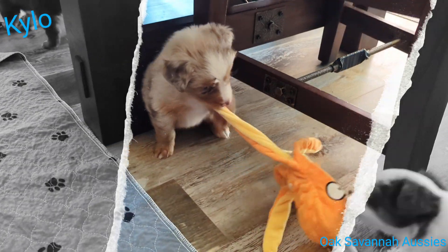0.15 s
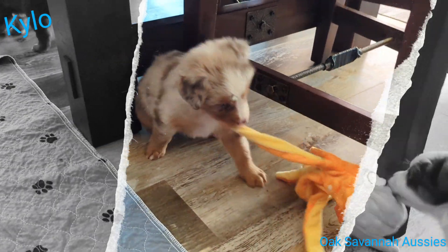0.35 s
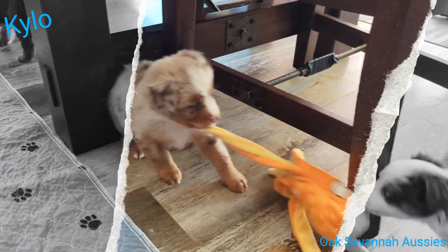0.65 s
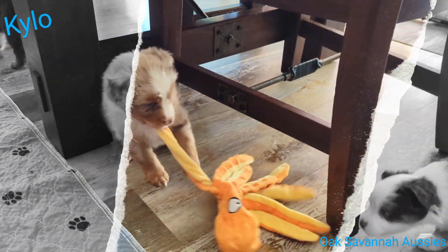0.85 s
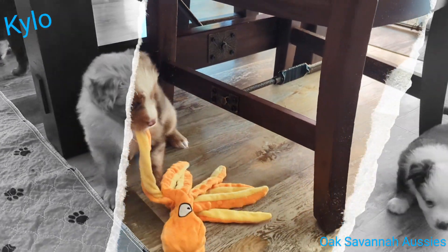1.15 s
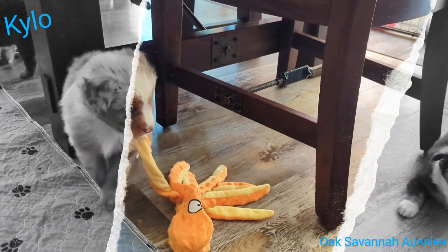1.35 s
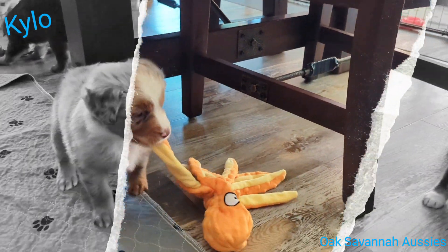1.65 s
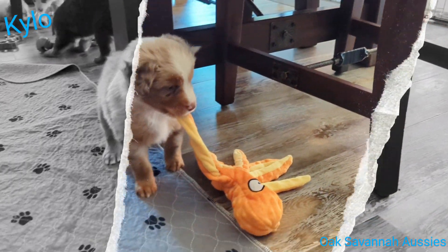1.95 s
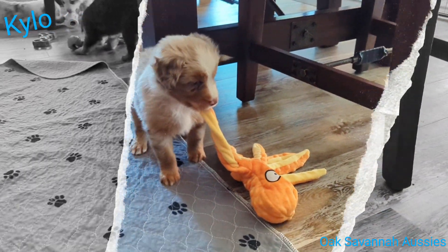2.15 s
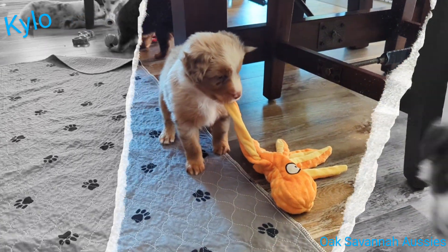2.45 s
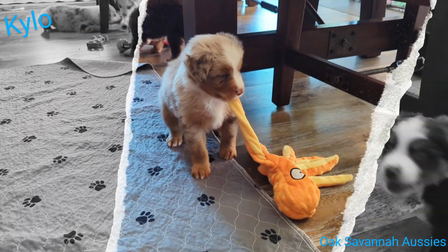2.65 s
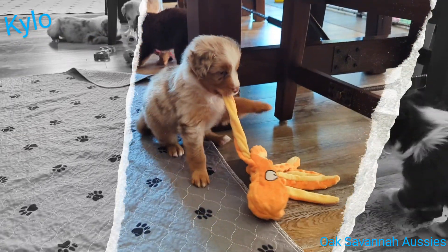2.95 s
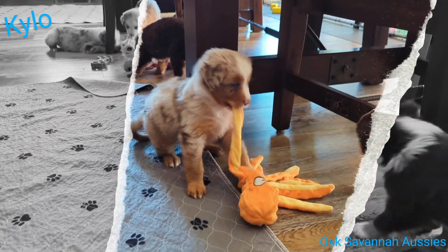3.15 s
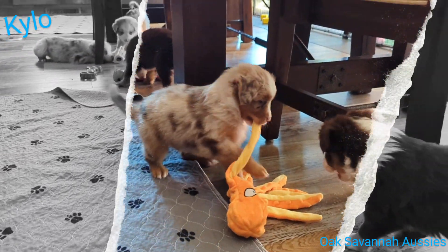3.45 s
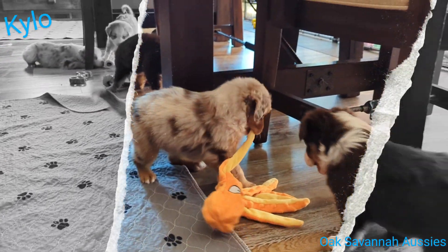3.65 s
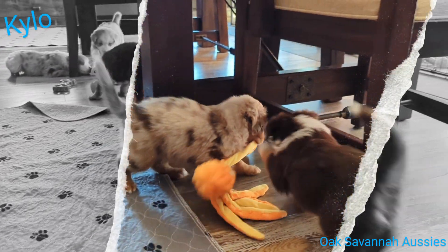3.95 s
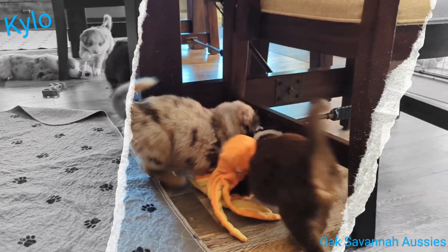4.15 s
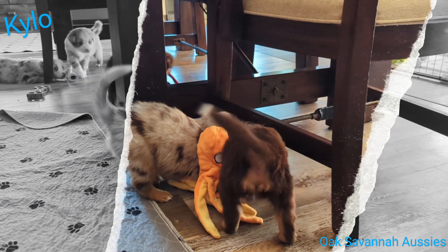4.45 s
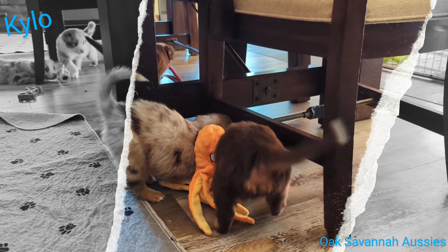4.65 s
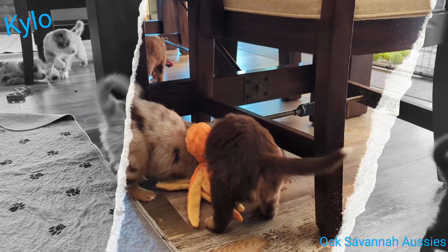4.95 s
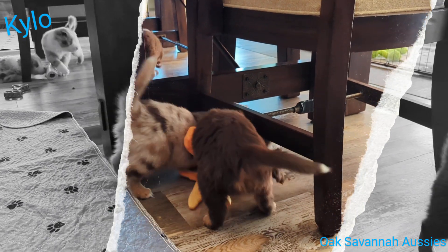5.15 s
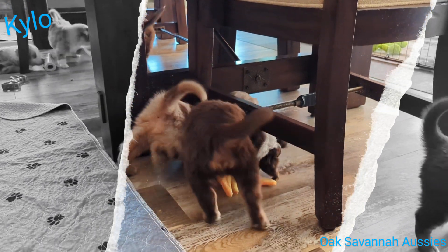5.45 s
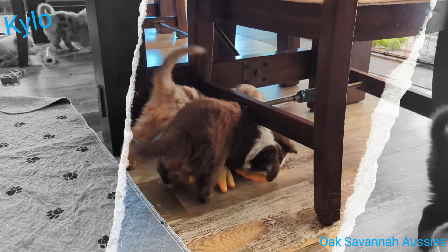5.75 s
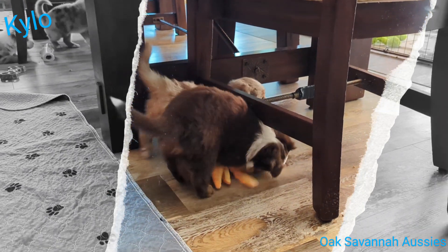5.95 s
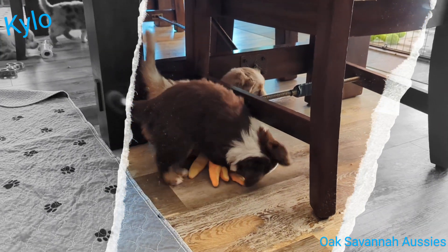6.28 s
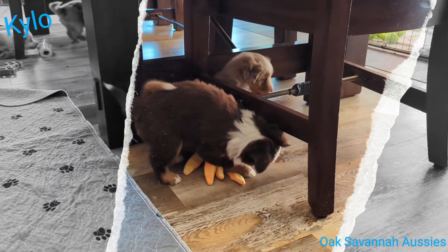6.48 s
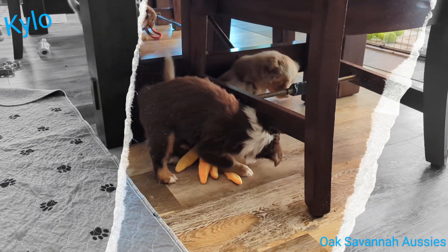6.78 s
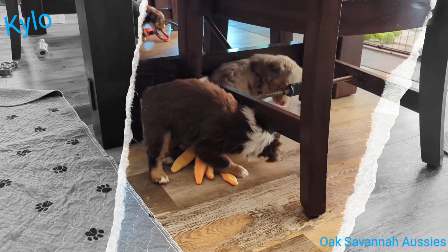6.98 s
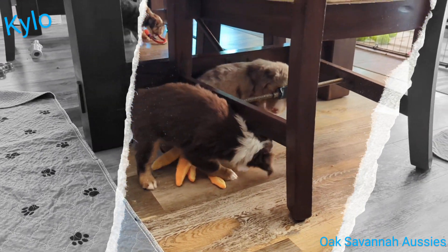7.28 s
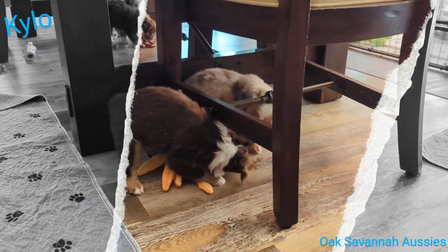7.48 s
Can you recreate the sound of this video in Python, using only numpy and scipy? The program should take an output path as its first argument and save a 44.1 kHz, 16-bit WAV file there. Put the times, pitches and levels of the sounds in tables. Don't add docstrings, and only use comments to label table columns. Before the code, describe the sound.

Close, low microphone in a quiet living room. Puppies brace and tug a plush toy, giving soft low thumps on floorboards, small claw ticks and thin foil crinkles. Soon a wooden chair is knocked hard, cracking and rattling with a short room echo. After a calmer moment, wrestling brings more thumps, crackles, fur rustle and light wood taps over faint house air.

```python
import sys
import numpy as np
from scipy import signal
from scipy.fft import rfft, irfft, next_fast_len
from scipy.io import wavfile
from scipy.ndimage import uniform_filter1d

SR = 44100
rng = np.random.default_rng(int(sys.argv[2]) if len(sys.argv) > 2 else 0)


def output_pcm(signal):
    pcm = np.clip(np.atleast_2d(signal).T, -1, 1) * 32767
    wavfile.write(sys.argv[1], SR, np.round(pcm).astype(np.int16))


def level_to_linear(level):
    exponent = np.asarray(level, float) / 20
    return 10 ** exponent


N = 336042


def unit(x):
    return x / np.sqrt(np.mean(x ** 2))


def colour(x, points):
    hz, db = np.transpose(points)
    size = next_fast_len(x.shape[-1])
    f = np.fft.rfftfreq(size, 1 / SR) + 1
    gain = level_to_linear(np.interp(np.log(f), np.log(hz), db))
    return irfft(rfft(x, size) * gain, size)[..., :x.shape[-1]]


def band(x, lo_hz, hi_hz):
    sos = signal.butter(2, [lo_hz, min(hi_hz, .45 * SR)], "band", fs=SR, output="sos")
    return signal.sosfilt(sos, x)


def walk(rate_hz):
    k = int(SR / rate_hz)
    held = np.repeat(rng.standard_normal(N // k + 1), k)
    return unit(uniform_filter1d(uniform_filter1d(held, k), k)[:N])


def pair(alike_hz):
    mid, side = rng.standard_normal((2, N))
    side = signal.sosfilt(signal.butter(1, alike_hz, "high", fs=SR, output="sos"), side)
    return np.array([mid + side, mid - side]) / np.sqrt(2)


def add(out, start_s, sound, peak_db, pan_db=0):
    i = int(start_s * SR)
    sound = sound[..., :N - i] * level_to_linear(peak_db) / np.abs(sound).max()
    out[:, i:i + sound.shape[-1]] += sound * level_to_linear([[pan_db / 2], [-pan_db / 2]])


def fade(t, t60_s, rise_s):
    return (1 - np.exp(-t / max(rise_s, 1e-5))) * np.exp(-np.log(1000) * t / max(t60_s, .004))


def strokes(rows, rest_db, bend=0.95):
    t = np.arange(0, N, SR // 2000) / SR
    power = 0
    for peak_s, swell_s, die_s, db in rows:
        away = np.maximum((peak_s - t) / max(swell_s, .004), (t - peak_s) / max(die_s, .004))
        power = power + level_to_linear(2 * (db - 20 * away ** bend))
    return 10 * np.log10(np.interp(np.arange(N) / SR, t, power) + level_to_linear(2 * rest_db))


# [start_s, peak_db, board_pitch_hz]
BRACING_PAWS = [(0.022, -36.5, 124), (0.357, -39.5, 112), (0.407, -36.5, 125), (0.508, -35, 159),
                (0.58, -32.5, 124), (0.647, -44, 145), (0.713, -30.5, 124), (0.837, -35.5, 171.6),
                (0.887, -35, 107), (1.005, -28.5, 124.3), (1.543, -18.5, 120.7), (1.601, -34, 130),
                (1.66, -28.5, 116.3), (1.9, -44, 112), (1.947, -33, 131.5), (2.022, -35.5, 140),
                (2.1, -42, 130), (2.211, -38.5, 126), (2.565, -43.5, 125), (2.677, -38.5, 129.7),
                (2.795, -39.5, 115.3)]
# [start_s, peak_db, board_pitch_hz]
WRESTLING_PAWS = [(3.074, -41, 99), (3.902, -36, 123), (4.106, -24, 106.6), (4.167, -29, 128),
                  (4.282, -37.5, 108), (4.362, -30, 109), (4.43, -29.5, 109.4), (4.69, -32.5, 117.4),
                  (4.765, -31, 106), (5.005, -37, 125), (5.191, -34.5, 114.4), (5.269, -24.5, 113.4),
                  (5.507, -41, 108), (5.589, -41, 73.5), (5.719, -30.5, 111.4), (6.447, -32.5, 106),
                  (6.815, -36.5, 126.5), (6.92, -23, 111), (7.099, -42.5, 126), (7.484, -37, 60)]


def paw_thumps():
    board_t60_s = 0.13
    bracing_knock_db, wrestling_knock_db = -14, -25.5
    out, t = np.zeros((2, N)), np.arange(SR // 5) / SR
    steps = [(*r, bracing_knock_db) for r in BRACING_PAWS]
    steps += [(*r, wrestling_knock_db) for r in WRESTLING_PAWS]
    for (s, db, hz, knock_db), noise in zip(steps, rng.standard_normal((len(steps), len(t)))):
        turn = 2 * np.pi * hz * (t + 0.0024 * (1 - np.exp(-t / 0.006)))
        low = np.sin(turn) + .3 * np.sin(1.352 * turn) + 0.37 * np.sin(0.551 * turn)
        add(out, s - .003, low * fade(t, board_t60_s, 0.02), db)
        add(out, s, band(noise * fade(t, 0.089, 0.0012), 180, 408), db + knock_db + 7)
    return out


# [start_s, peak_db, centre_hz, ring_t60_s]
CLAW_TICKS = [(0.4005, -45.5, 2520, 0.03), (0.512, -39.5, 2260, .037), (1.1845, -41, 4840, .019),
              (1.2675, -57.5, 2050, 0.016), (1.6655, -44, 4420, 0.02), (1.9015, -42, 2490, 0.021),
              (2.0242, -37, 2560, 0.057), (2.214, -47, 3060, .026), (3.27, -36, 3650, 0.028),
              (3.2924, -41, 4470, .02), (3.704, -39, 2100, .02), (7.544, -47, 4500, .03),
              (4.0959, -36, 2210, 0.046), (4.2187, -28.5, 2300, .02), (4.7827, -45, 2180, .02),
              (5.0306, -33.5, 2300, 0.03), (5.1791, -41.5, 2510, .017), (5.3925, -46, 3440, 0.021),
              (5.9498, -43, 2180, 0.07), (6.2895, -45, 2650, 0.054), (6.3656, -43, 2580, 0.037),
              (6.3894, -43, 3650, .022), (6.5856, -43.5, 2400, .022)]
# [start_s, peak_db, centre_hz,
# ring_t60_s]
FOIL_SNAPS = [(0.037, -40, 7240, 0.049), (0.1072, -36.5, 7100, 0.026), (0.178, -34.5, 7100, 0.049),
              (0.2486, -30.5, 12100, 0.075), (0.4996, -42, 11900, .016), (0.827, -33.5, 8200, 0.012),
              (1.0698, -35.5, 10700, 0.025), (1.2312, -36, 7560, 0.0096), (1.3739, -10, 6500, 0.03),
              (2.7196, -42, 7440, 0.048), (2.7848, -33.5, 9100, 0.2), (3.2375, -33, 9100, 0.025),
              (3.3305, -27.5, 6200, 0.02), (3.33, -30, 12000, 0.02), (3.393, -41.5, 7700, 0.043),
              (3.5317, -37, 7400, 0.052), (3.982, -37.5, 6600, 0.045), (4.2116, -25, 7300, 0.044),
              (4.2405, -36, 6500, 0.018), (5.0559, -31, 11900, 0.03), (5.0558, -32, 5300, 0.03),
              (5.0806, -32, 9100, 0.02), (5.207, -37.5, 6800, 0.046), (5.5077, -34.5, 10600, 0.049),
              (5.5728, -35, 8500, 0.057), (5.583, -37.5, 8000, .03), (6.4615, -35, 6100, 0.031),
              (6.4843, -38, 8060, 0.15), (6.761, -29, 8760, 0.024), (7.0204, -39.5, 7400, 0.03),
              (3.2032, -29.5, 5200, 0.062), (3.6012, -35.5, 4230, 0.046), (3.677, -36.5, 3150, 0.04),
              (3.7386, -29.5, 3260, 0.15), (3.7495, -34, 9000, .04), (3.7635, -32, 3000, 0.033),
              (5.0308, -24.5, 5230, 0.032), (3.6175, -43, 4500, .02)]
# [start_s, peak_db, centre_hz]
FAINT_SNAPS = [(0.0209, -46, 6700), (0.204, -47, 2220), (0.4317, -41, 8400), (0.7387, -41.5, 5660),
               (1.588, -38.5, 4180), (1.774, -44.5, 2087), (2.1291, -47, 7030), (2.4453, -49, 8340),
               (2.6125, -52, 2055), (2.64, -44, 5300), (2.829, -38, 7600), (3.6465, -43, 6370),
               (3.846, -41, 5600), (4.122, -40, 8060), (4.2183, -35, 5000), (4.595, -47, 3960),
               (4.668, -62.5, 8900), (4.683, -44.5, 7400), (4.944, -43.5, 11000), (5.047, -44, 5500),
               (5.2619, -41.5, 6800), (5.3433, -43, 7600), (6.0225, -42.5, 7300), (6.417, -47, 6550),
               (7.1075, -39, 8250), (7.45, -49, 6000), (1.8809, -47.5, 2400), (1.934, -48.5, 2490),
               (2.318, -44, 9140), (3.219, -39, 4600), (3.2615, -38, 10500), (3.264, -41, 2100),
               (3.3455, -45, 5000), (3.415, -42, 8000), (5.0725, -43, 5500), (5.113, -48, 8200),
               (5.6682, -42, 8460), (5.8677, -47, 6700), (5.9336, -48, 5320), (5.985, -47, 4200),
               (6.1196, -47, 3980), (6.1985, -46.5, 7480), (6.3157, -48, 6800), (6.641, -50, 5090),
               (6.6928, -42, 6600), (7.19, -47, 8500), (7.256, -47, 6500), (7.3813, -46, 6550),
               (7.514, -48.5, 6530)]


def claws_and_foil():
    claw_wide, foil_wide, faint_wide = 0.41, 0.74, .7
    faint_ring_s = 0.033
    bounce_s, bounce_db = .0033, -8
    pan_db_per_octave, centred_hz = 2.5, 5000
    out, t = np.zeros((2, N)), np.arange(SR // 16) / SR
    rows = [(*r, claw_wide) for r in CLAW_TICKS]
    rows += [(*r, foil_wide) for r in FOIL_SNAPS]
    rows += [(*r, faint_ring_s, faint_wide) for r in FAINT_SNAPS]
    bounce = level_to_linear(bounce_db) * fade(np.maximum(t - bounce_s, 0), 0.013, .0004)
    tick = fade(t, 0.0069, 0.00032) + bounce
    for (s, db, hz, t60_s, wide), noise in zip(rows, rng.standard_normal((len(rows), 4, len(t)))):
        grit = (0.32 * noise[0] + noise[1:3]) * level_to_linear(3.06 * noise[3])
        spray = grit * (tick + 0.42 * fade(t, t60_s, 0.0004))
        low_hz = 1200 + 0.25 * hz
        centre = band(spray, 0.86 * hz, 1.23 * hz)
        crackle = band(band(spray, low_hz, 16000), low_hz, 11000 + 0.33 * hz)
        pan_db = pan_db_per_octave * np.log2(hz / centred_hz)
        add(out, s, centre + wide * crackle, db + 2.5, pan_db)
    return out


# [start_s, level_db re the main blow]
CHAIR_BLOWS = [(1.3695, -22), (1.373, 1.5), (1.384, -8.5), (1.397, -23), (1.419, -9.5), (1.43, -9.5),
               (1.46, -14), (1.481, -18), (1.664, -21), (1.402, -14.5), (1.443, -14)]
# [pitch_hz, level_db, t60_s]
CHAIR_MODES = [(61.4, -10, 0.28), (108, -3.5, 0.18), (124, 3, 0.23), (159, -2.5, 0.19), (234, -7, 0.21),
               (276.2, -5, 0.23), (356, -14, 0.25), (416.8, -6, 0.29), (438.3, -8, 0.27), (505, 1, 0.15),
               (572.3, -1, 0.22), (654.4, -5.5, 0.23), (785, -20.5, 0.6)]
# [frequency_hz, level_db per Hz]
CRACK_COLOUR = [(35, -48.5), (113, -8), (198, -9), (566, -15), (1380, -16), (2900, -24), (6140, -20),
                (13600, -54.5)]
# [centre_hz, width_hz, level_db, t60_s]
LOOSE_JOINTS = [(2180, 1900, -14.5, 0.33), (4050, 900, -13.5, 0.32), (6200, 1100, -15.5, 0.18),
                (8200, 1600, -15, 0.15), (6500, 8400, -12.5, 0.18)]


def chair_knock():
    knock_db = -11
    out, t = np.zeros((2, N)), np.arange(SR // 2) / SR
    for (s, db), noise in zip(CHAIR_BLOWS, rng.standard_normal((len(CHAIR_BLOWS), 3, len(t)))):
        grit = noise[0] + 1.28 * noise[1:]
        crack = unit(colour(grit, CRACK_COLOUR)) * fade(t, 0.065, 0.0023)
        for hz, width_hz, joint_db, t60_s in LOOSE_JOINTS:
            joint = unit(band(grit, hz - width_hz / 2, hz + width_hz / 2))
            crack = crack + level_to_linear(joint_db) * joint * fade(t, t60_s, 0.0014)
        ring = 0
        for (hz, mode_db, t60_s), vary in zip(CHAIR_MODES, noise[0]):
            tone = np.sin(2 * np.pi * hz * (1 + 0.0085 * vary) * t)
            ring = ring + level_to_linear(mode_db + 1.5 * vary) * tone * fade(t, t60_s, 0.00076)
        add(out, s, crack, knock_db + db - 1.5)
        add(out, s, ring, knock_db + db + 3.5)
    return out


# [start_s, peak_db, pitch_hz, ring_t60_s]
WOOD_TAPS = [(.895, -39, 575, 0.014), (3.876, -42, 448, 0.031), (4.097, -44, 990, 0.092),
             (4.107, -35.5, 830, 0.034), (4.165, -33, 850, 0.044), (4.2415, -43, 1900, 0.015),
             (5.083, -35.5, 1240, 0.08), (5.263, -40.5, 377, 0.036), (5.484, -38.5, 970, 0.14),
             (5.551, -44, 1840, 0.017), (5.591, -38.5, 202, 0.19), (5.673, -44, 624, 0.033),
             (5.948, -49.5, 1560, 0.13), (6.796, -47.5, 900, 0.17), (6.835, -49, 1170, 0.18)]


def wood_taps():
    out, t = np.zeros((2, N)), np.arange(SR // 4) / SR
    for (s, db, hz, t60_s), noise in zip(WOOD_TAPS, rng.standard_normal((len(WOOD_TAPS), 3, len(t)))):
        scuff = (noise[0] + 1.1 * noise[1:]) * fade(t, t60_s, 0.0011)
        push = scuff + 7.0 * (t == 0)
        late_push = push * np.exp(4.0 * t / t60_s).clip(0, 8)
        sag = 1.4 * band(late_push, 0.77 * hz, .88 * hz) * fade(t, 3, 0.022)
        ring = band(push, 0.85 * hz, 1.22 * hz)
        body = band(push, 0.64 * hz, min(1.88 * hz, 2700))
        add(out, s, ring + 0.3 * body + 0.34 * sag, db + 2.0, -1.5)
    return out


# [peak_s, swell_s per 20 dB, die_s per 20 dB,
# peak_db]
FUR_STROKES = [(0.0, .01, .5, -65), (.25, 0.06, 0.2, -56.5), (.4, 0.5, 0.5, -63), (.59, 0.15, 0, -48),
               (.63, -0.1, 0.7, -59), (.83, 0, 0.04, -41.5), (1.33, 0.6, 0.7, -56),
               (1.38, -0.0057, 0.0151, -23), (1.68, -0.2, 0.45, -61), (2.06, 0, 0.33, -64.5),
               (2.29, 0.07, 0.15, -54), (2.8, -0.0152, 0.0561, -44), (2.97, 0.29, 0.14, -53.5),
               (3.2, -0.11, 0.36, -51), (3.33, -0.09, 0.28, -56), (3.61, -0.426, 0.42, -53.5),
               (3.76, 0.05, 0.28, -54), (3.95, 0.02, -0.15, -46), (4.1, -0.05, 0.17, -53),
               (4.22, 0.05, 0.0736, -43.5), (4.36, 0.23, 0.18, -52.5), (4.72, 1, 1.5, -68.5),
               (5.03, 0, 0.57, -56), (5.53, 0.2, .2, -57), (5.72, 0.36, 0.15, -56.5),
               (6.05, 0.4, 0.05, -60.5), (6.49, .1, 0.24, -58.5), (6.33, .3, 0.3, -64),
               (6.72, 0.16, 0.35, -53.5), (7.02, .01, 0.74, -56.5)]
# [peak_s, swell_and_die_s per 20 dB, peak_db]
FOIL_FLEXES = [(.04, 0, -60), (.59, 0.03, -49), (1.07, 0.15, -59), (1.57, 0.08, -54.5), (2.31, 0.15, -59),
               (2.81, -0.02, -49.5), (3.25, -0.1, -57), (3.94, -0.06, -45), (4.339, 0, -43),
               (5.55, 0.06, -50), (5.72, 0, -49), (6.04, -0.33, -49), (6.76, -0.47, -50)]
# [frequency_hz, level_db per Hz]
FUR_COLOUR = [(1470, -2), (2500, -0.5), (4200, -1.5), (6400, 2.5), (8500, 1), (10000, -8), (13000, -2.5),
              (16000, -19)]


def fur_and_foil_hiss():
    resting_fur_db, resting_foil_db = -85.5, -88
    fur_db = strokes(FUR_STROKES, resting_fur_db, bend=1.12)
    fur_db = np.minimum(fur_db, np.roll(fur_db, SR // 70))
    flexes = [(s, swell_s, swell_s, db) for s, swell_s, db in FOIL_FLEXES]
    foil_db = strokes(flexes, resting_foil_db, bend=1.5)
    grain = level_to_linear(1.3 * walk(35) + 1.97 * walk(300))
    fur = unit(colour(pair(300) * grain, FUR_COLOUR))
    foil = unit(band(pair(300) * grain, 11000, 14500) + .5 * band(pair(300) * grain, 6500, 9000))
    return level_to_linear(fur_db + 2.5) * fur + level_to_linear(foil_db) * foil


# [peak_s, swell_s per 20 dB, die_s per 20 dB, peak_db, centre_hz]
PITCHED_SLIDES = [(1.9, -0.1, .15, -61, 2400), (2.3, .1, 0.14, -59, 7500), (4.25, 0.13, 0.16, -56, 2000),
                  (4.34, 0.03, 0.05, -53.5, 6500), (5.53, 0.1, 0.09, -50.5, 7800),
                  (5.7, 0.13, 0.09, -53, 7500), (5.96, -0.14, 0.14, -60, 1700),
                  (6.05, 0.16, 0, -59.5, 7000), (6.22, 0.3, 0.3, -64.5, 6000),
                  (6.835, 0.04, 0.24, -51.5, 2000), (6.84, 0.14, 0.35, -54, 950),
                  (5.09, .01, 0.19, -52, 1300), (5.49, 0.12, 0.26, -54, 1050), (7.3, 0.1, 0.1, -59, 7000),
                  (7.03, 0.15, 0.1, -58.5, 6000), (7.12, 0.1, 0.18, -57, 5800),
                  (7.27, 0.1, 0.34, -59, 5500)]


def pitched_slides():
    noise = pair(300) * level_to_linear(1.6 * walk(60) + 1.9 * walk(320))
    out = np.zeros((2, N))
    for *stroke, hz in PITCHED_SLIDES:
        out += level_to_linear(strokes([stroke], -120, bend=1.2)) * unit(band(noise, .7 * hz, 1.38 * hz))
    return out


# [time_s, level_db]
WEIGHT_SHIFTS = [(0.0, -49), (0.38, -49), (0.66, -33.5), (1.04, -46.5), (1.29, -37.5), (1.57, -49),
                 (1.74, -60), (2.05, -38.5), (2.42, -51), (3.73, -57.5), (4.08, -46.5), (4.29, -59),
                 (5.05, -57.5), (5.18, -69), (5.64, -40), (6.05, -53), (7.34, -51.5), (7.58, -50.5)]
# [peak_s, swell_s per 20 dB, die_s per 20 dB, upper_boards_db, swish_db]
HARD_SHOVES = [(.85, 0, 0.1, -59, -47.5), (1.06, 0, .2, -62, -43), (1.347, 0.11, 0.06, -41.5, -33),
               (1.379, 0.0072, 0.22, -11, -31), (1.95, 1.2, 0.34, -50, -49.5),
               (4.11, 0.08, 0.4, -39.5, -68), (4.48, 1, 0.7, -47.5, -62), (5.09, 0.33, 1.2, -46.5, -51.5),
               (6.1, 1, 2, -52, -59), (6.85, 0.04, 0.5, -44, -58), (7.34, 0.53, 0.8, -45.5, -47.5)]
# [frequency_hz, level_db per Hz]
BOARD_COLOUR = [(30, -29), (48, -16.5), (75, -17.5), (113, -6.5), (133, -4.5), (163, -13), (260, -19),
                (400, -57)]


def floor_shuffle():
    times_s, levels_db = np.transpose(WEIGHT_SHIFTS)
    rumble_db = np.interp(np.arange(N) / SR, times_s, levels_db)
    upper_rows = [(s, swell_s, die_s, db) for s, swell_s, die_s, db, _ in HARD_SHOVES]
    swish_rows = [(s, swell_s, die_s, db) for s, swell_s, die_s, _, db in HARD_SHOVES]
    upper_db = strokes(upper_rows, rumble_db - 7.5)
    swish_db = strokes(swish_rows, rumble_db - 18)
    lumps = level_to_linear(2.4 * walk(16))
    low = unit(colour(pair(1500) * lumps, BOARD_COLOUR))
    upper = unit(band(pair(460) * lumps, 170, 420) + 0.71 * band(pair(370), 350, 860))
    swish = unit(band(pair(300) * level_to_linear(0.5 * walk(25)), 1440, 3150))
    return level_to_linear(-4.5) * (level_to_linear(rumble_db) * low + level_to_linear(upper_db - 4.5) * upper + level_to_linear(swish_db - 5.0) * swish)


# [centre_hz, t60_s]
ROOM_DECAY = [(80, 0.55), (250, 0.68), (700, 0.6), (2000, 0.69), (5000, 0.53), (12000, 0.37)]


def room(x):
    t = np.arange(SR) / SR
    noise = pair(660)[:, :SR]
    tail = sum(band(noise, hz / 2.26, hz * 1.7) * fade(t, t60_s, 0.0016) for hz, t60_s in ROOM_DECAY)
    tail = tail / np.sqrt(np.sum(tail ** 2) / 2)
    return signal.fftconvolve(x.mean(axis=0)[None], tail, axes=1)[:, :N]


# [frequency_hz, level_db per Hz]
AIR_COLOUR = [(35, -18.5), (58, 3), (78, -5.5), (120, -1), (200, -18.5), (320, -23.5), (420, -13.5),
              (1250, -29), (2000, -29), (3300, -38.5), (16500, -68.5)]


def house_air():
    return unit(colour(pair(740), AIR_COLOUR)) * level_to_linear(-51.5 + 0.12 * walk(2.6))


def scene():
    paws, ticks, knock, wood = paw_thumps(), claws_and_foil(), chair_knock(), wood_taps()
    echoes = room(level_to_linear(-5.0) * paws + level_to_linear(-9.0) * ticks + level_to_linear(-5.0) * knock + level_to_linear(-3.5) * wood)
    hits = paws + ticks + knock + wood
    return hits + echoes + fur_and_foil_hiss() + pitched_slides() + floor_shuffle() + house_air()


def roll_off(x):
    return signal.sosfilt(signal.butter(12, 16830, fs=SR, output="sos"), x)


def record(dry):
    mix = signal.sosfilt(signal.butter(5, 44, "high", fs=SR, output="sos"), dry)
    mix = signal.sosfilt(signal.ellip(8, .3, 40, 15650, fs=SR, output="sos"), mix)
    return roll_off(mix)


dry = scene()
out = record(dry)
output_pcm(out)
```